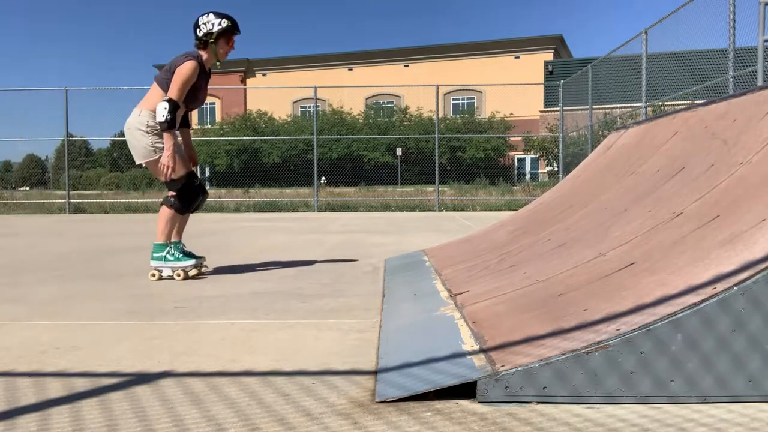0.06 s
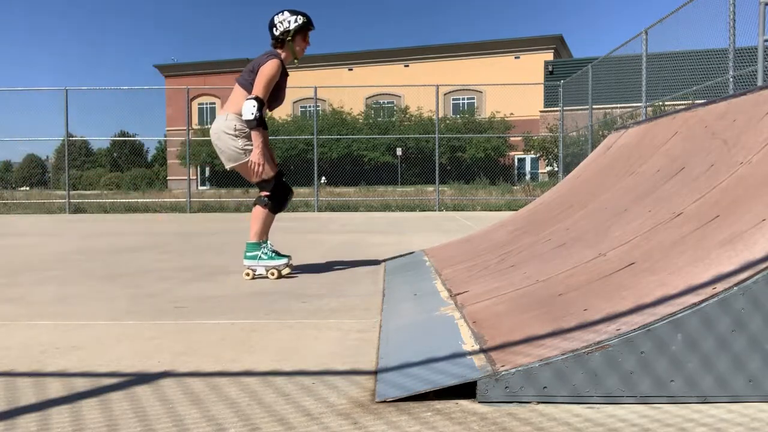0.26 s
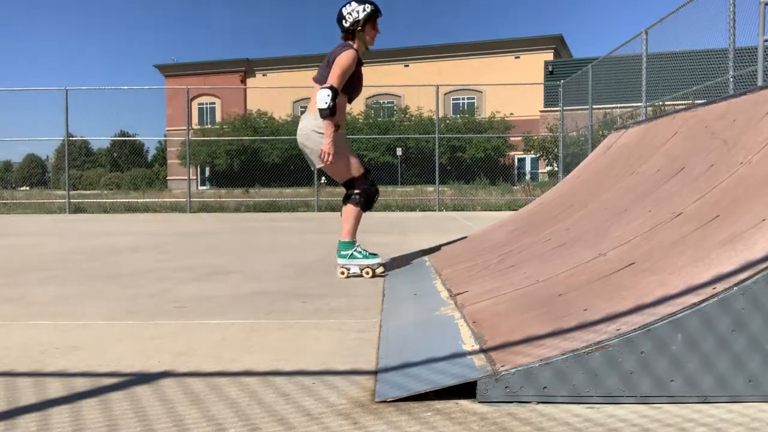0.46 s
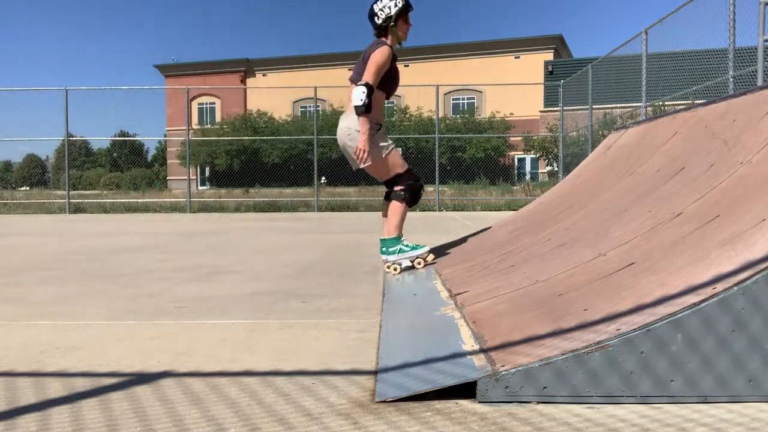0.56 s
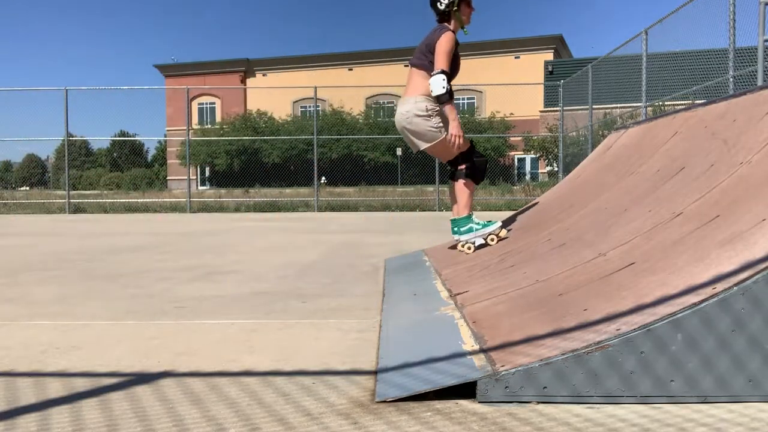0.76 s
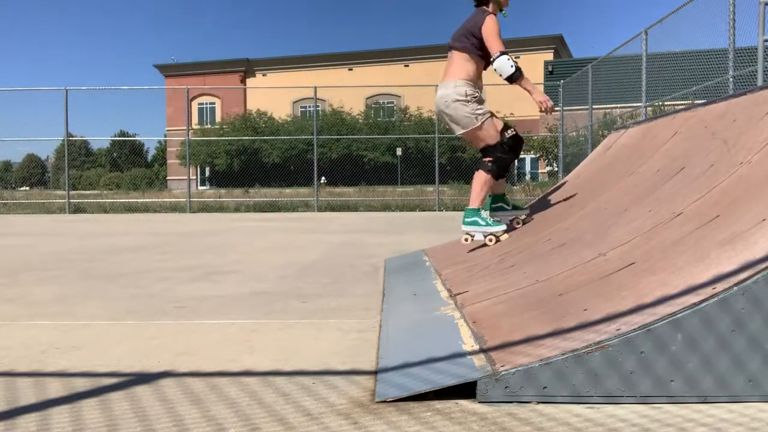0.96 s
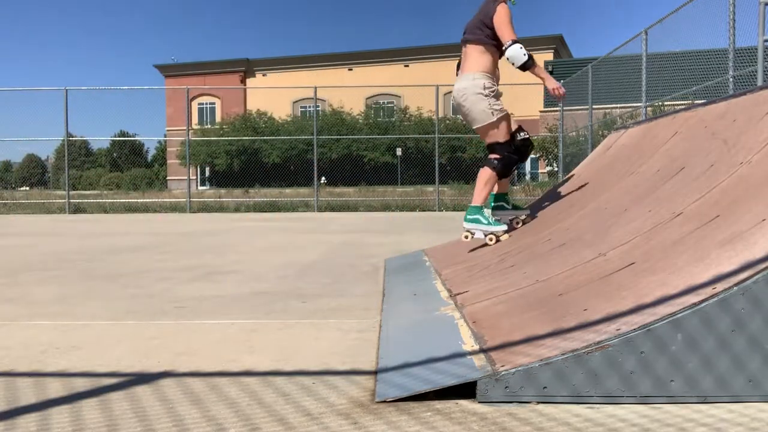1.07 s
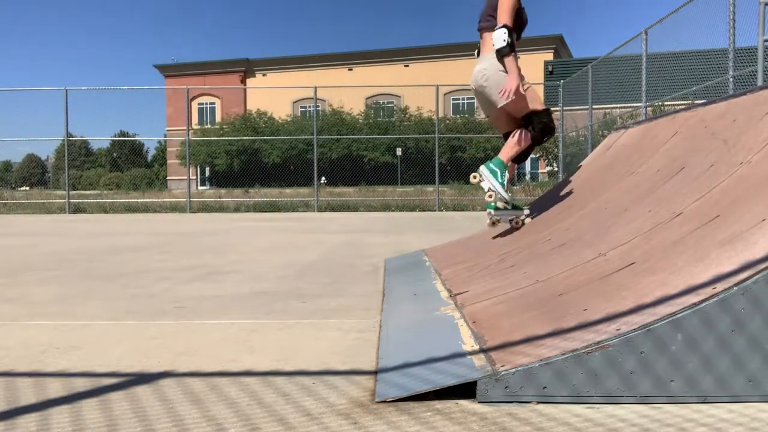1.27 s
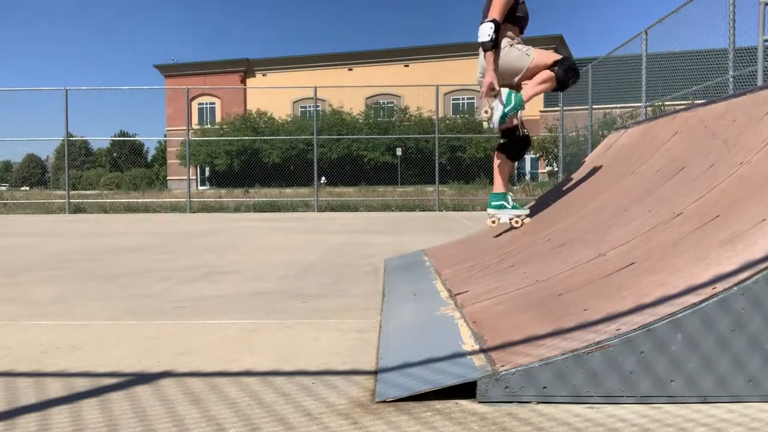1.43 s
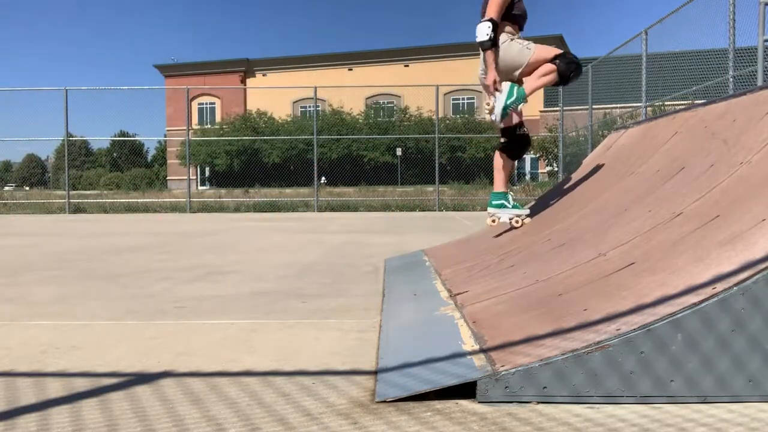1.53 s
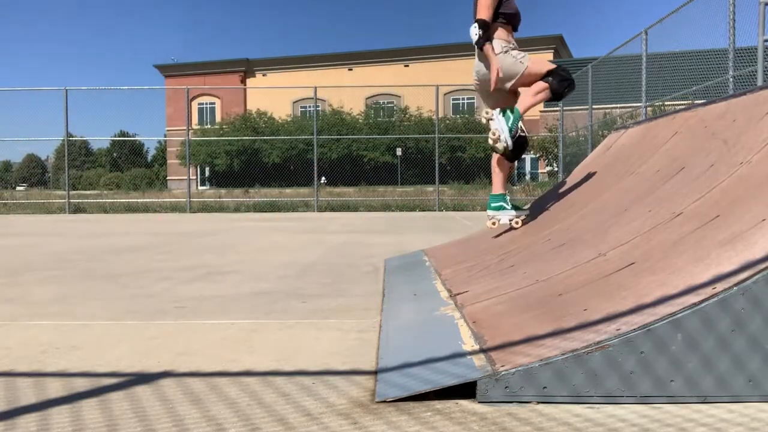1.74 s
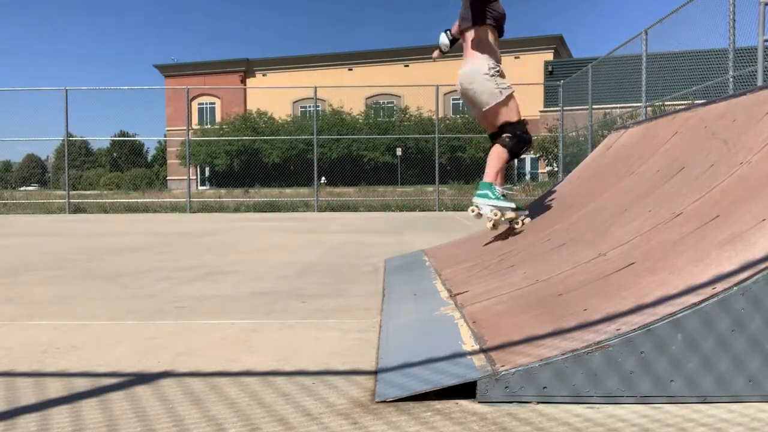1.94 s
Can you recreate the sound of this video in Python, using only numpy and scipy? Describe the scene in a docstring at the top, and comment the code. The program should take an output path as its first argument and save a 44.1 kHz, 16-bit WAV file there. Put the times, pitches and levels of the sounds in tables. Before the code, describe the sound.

Roller skates roll over concrete, clack loudly onto a ramp and rumble up it.

```python
"""Roller skates roll in from the left over concrete, drumming and rattling, trucks ticking, while a light
wind rumbles on the microphone over faint open air. A wheel bearing whines briefly. Just past half a
second the wheels clack across the steel lip of a quarter pipe, each strike ringing the plate. The hollow
deck thumps and booms under the skater's weight, and the roar of the wheels sinks in pitch as the climb
slows them on the right. A few last ticks and rattles are left in the wind."""
import sys
import numpy as np
from scipy import signal
from scipy.fft import rfft, irfft
from scipy.io import wavfile
from scipy.ndimage import map_coordinates

SR = 44100
rng = np.random.default_rng(int(sys.argv[2]) if len(sys.argv) > 2 else 0)


def dump_mix(stems):
    """Bounce the given channels to the path in sys.argv[1] as a 16-bit WAV at rate SR."""
    frames = np.atleast_2d(stems).T  # one column per channel
    limited = np.clip(frames, -1, 1)  # hard clip at full scale
    pcm = np.round(limited * 32767).astype(np.int16)
    wavfile.write(sys.argv[1], SR, pcm)


N = 88200

# wheels striking the lip plate (time [s], bright ring [dB], low clank [dB], crack [dB])
LIP_STRIKES = [(0.5529, -46.5, -30, -38.5), (.5700, -37, -31.5, -31.5), (0.5736, -29, -28, -32.5),
               (0.5762, -8.5, -17, -26.5), (.5812, -10.5, -6, -39.5), (.5870, -6, -11.5, -24.5),
               (.5935, -32, -8.5, -29), (.604, -23, -19.5, -35.5), (.6183, -5.5, -17.5, -34.5),
               (0.6215, -27, -4.5, -21), (0.6352, -7, -23.5, -40.5), (.6465, -26, -23, -42.5)]
SIDE = np.array([[1], [-1]])  # opposite polarity left and right, for width


def undb(db):
    """Decibels to gain."""
    return 10 ** (np.asarray(db) / 20)


def unit(x):
    """Scale to rms 1."""
    return x / np.sqrt(np.mean(x ** 2))


def clock():
    """Time of every sample, in seconds."""
    return np.arange(N) / SR


def curve(rows, column=1):
    """Automation lane: one column of a table, joined by straight lines in time."""
    rows = np.array(rows, float)
    return np.interp(clock(), rows[:, 0], rows[:, column])


def colour(x, spectrum):
    """EQ x through (frequency [Hz], level [dB]) points, then scale to rms 1."""
    hz, db = np.array(spectrum, float).T
    bins = np.maximum(np.fft.rfftfreq(N, 1 / SR), 1)
    gain = undb(np.interp(np.log(bins), np.log(hz), db))
    return unit(irfft(rfft(x) * gain, N))


def noise(spectrum):
    """Coloured noise at rms 1."""
    return colour(rng.standard_normal(N), spectrum)


def wide(spectrum, side):
    """Stereo noise: a mid layer plus an independent side layer."""
    return noise(spectrum) + side * noise(spectrum) * SIDE


def below(x, hz):
    """The part of x under a steep crossover."""
    return irfft(rfft(x) / (1 + (np.fft.rfftfreq(N, 1 / SR) / hz) ** 16), N)


def fade(start, t60, attack):
    """Envelope of a blow: a short rise and an exponential decay, all times in seconds."""
    age = np.maximum(clock() - start, 0)
    return (1 - np.exp(-(age / attack) ** 2)) * np.exp(-np.log(1000) * age / t60)


def wind():
    """Light gusts rumble on the microphone."""
    spectrum = [(15, -5), (35, 0), (55, -1.5), (100, -8), (200, -24.5), (400, -48), (1500, -112)]  # deep buffeting (frequency [Hz], level [dB])
    gusts = [(0, -44.5), (.2, -34.5), (.42, -29), (.5, -29.5), (.6, -28), (.85, -36), (1.15, -30.5),
             (1.4, -32), (1.52, -32.5), (1.66, -41.5), (2, -36)]  # rise and fall of the wind (time [s], level [dB])
    return wide(spectrum, side=0.4) * undb(curve(gusts))


def open_air():
    """A faint, steady bed of outdoor noise."""
    spectrum = [(30, -0.5), (150, -1.5), (300, -7.5), (500, -16.5), (1000, -17), (2000, -28.5), (4000, -38),
                (8000, -50), (16000, -68)]  # dark ambience (frequency [Hz], level [dB])
    return wide(spectrum, side=0.5) * undb(-51.5)


def tread(spectrum):
    """Dense bumps of surface grit under the wheels, fluttering as they turn."""
    grit_db, flutter_db = 4, 2
    bumps = rng.standard_normal(N) * undb(grit_db * np.minimum(rng.exponential(size=N), 6))
    flutter = noise([(1, 0), (25, 0), (60, -20), (200, -70)])
    return colour(bumps, spectrum) * undb(flutter_db * flutter)


def rolling():
    """Wheels on concrete, then on the deck, where the roar sinks in pitch as the climb slows them."""
    concrete_tone = [(40, -14), (120, -11.5), (300, -8), (650, -7), (900, -22.5), (1300, -17.5),
                     (2200, -32), (4000, -35.5), (9000, -33), (16000, -38.5)]  # wheels on the slab (frequency [Hz], level [dB])
    concrete_roll = [(0, -45), (.15, -48), (.25, -47.5), (.35, -47.5), (.44, -47), (.54, -47.5),
                     (.62, -52.5), (.72, -66.5)]  # the approach (time [s], level [dB])
    deck_tone = [(40, -7), (100, 1), (250, -5), (410, 0), (530, -6.5), (640, -5.5), (820, -14.5),
                 (1150, -16), (1600, -26.5), (2500, -40), (5000, -40.5), (10000, -43), (16000, -54)]  # wheels on the deck at full speed (frequency [Hz], level [dB])
    deck_roll = [(.55, -49, 1), (.6, -30, 0.93), (.7, -28.5, 1), (.77, -30, 0.98), (.86, -34.5, .9),
                 (.935, -37, .76), (.985, -44.5, 0.66), (1.13, -53, 0.46), (1.5, -77.5, 0.44)]  # the climb (time [s], level [dB], speed [1 = at the ramp's foot])
    travel = np.cumsum(curve(deck_roll, column=2))
    roar = map_coordinates(tread(deck_tone), [travel], mode="mirror")  # varispeed
    return tread(concrete_tone) * undb(curve(concrete_roll)) + roar * undb(curve(deck_roll))


def slab_drumming():
    """The wheels drum low on the concrete slab."""
    spectrum = [(40, -17), (90, 6.5), (130, 0), (200, -3), (300, -20), (800, -67.5)]  # bass of the slab (frequency [Hz], level [dB])
    swells = [(0, -50.5), (.18, -42.5), (.235, -26), (.33, -37), (.43, -30.5), (.5, -40), (.56, -36),
              (.62, -55.5), (.8, -90.5)]  # surges of drumming (time [s], level [dB])
    return noise(spectrum) * undb(curve(swells))


def rattles():
    """Showers of tiny clicks from bearings, buckles and wheels as the feet shift."""
    showers = [(0, 0.13, -62.5), (0.222, 0.13, -62), (0.427, .13, -66.5), (1.001, .06, -47.5),
               (1.083, 0.039, -56), (1.221, .03, -71.5), (1.378, 0.13, -66), (1.551, 0.15, -62.5),
               (1.861, 0.1, -62.5)]  # bursts of rattle and scuff (start [s], length [s], level [dB])
    spectrum = [(700, 3), (2000, -2.5), (3800, 3.5), (5000, -3), (6200, -0.5), (9000, -8.5), (12000, -19.5),
                (16000, -15)]  # bright clatter (frequency [Hz], level [dB])
    clicks_per_s, scatter_db = 380, 2.2
    onsets = rng.random(N) < clicks_per_s / SR
    clicks = onsets * undb(scatter_db * np.minimum(rng.exponential(size=N), 4))
    chatter = unit(signal.fftconvolve(clicks, fade(0, t60=.012, attack=.0003))[:N])
    envelope = np.zeros(N)
    for start, length, db in showers:
        progress = np.clip((clock() - start) / length, 0, 1)
        envelope += undb(db) * np.sqrt(np.sin(np.pi * progress).clip(0))
    return noise(spectrum) * chatter * envelope


def truck_ticks():
    """Loose metal in the trucks and bearings gives small bright ticks, each with a faint tail."""
    ticks = [(0.09, -41), (.422, -43.5), (0.476, -62), (0.737, -35), (0.7625, -36), (.767, -41.5),
             (1.008, -39.5), (1.0167, -32.5), (1.022, -36.5), (1.028, -40), (1.039, -35), (1.043, -46),
             (1.053, -44), (1.066, -35), (1.453, -48), (1.753, -37)]  # metal touching metal (time [s], level [dB])
    spectrum = [(400, 0), (2000, -6), (3400, -3), (4300, 8), (5000, 9.5), (6000, 4.5), (7200, -9),
                (8600, 9), (11000, -1), (13500, -4), (15500, -6)]  # thin metallic top (frequency [Hz], level [dB])
    envelope = np.zeros(N)
    for start, db in ticks:
        snap = fade(start, t60=.015, attack=.0004)
        tail = undb(-25) * fade(start, t60=.09, attack=.002)
        envelope += undb(db) * (snap + tail)
    return noise(spectrum) * envelope


def wheel_knocks():
    """A wheel knocks on the ground or the deck: a short, dull burst of noise."""
    knocks = [(.245, -39), (0.276, -39), (0.7397, -17.5), (1.008, -37.5), (1.02, -34.5), (1.037, -33.5),
              (1.381, -45.5)]  # wheel impacts (time [s], level [dB])
    spectrum = [(100, -21), (300, -7), (700, 1.5), (1250, -14), (1500, -36), (2300, -26.5), (3000, -33),
                (8000, -41)]  # boxy midrange (frequency [Hz], level [dB])
    return noise(spectrum) * sum(undb(db) * fade(start, t60=.025, attack=.00013) for start, db in knocks)


def bearing_whine():
    """A wheel bearing whines just before the ramp: a narrow, unsteady band of noise."""
    swell = [(.3, -130), (.39, -103), (.43, -68.5), (.55, -64.5), (.6, -79), (.7, -130)]  # rise and fall of the whine (time [s], level [dB])
    centre_hz, width_hz = 5120, 400
    waver = below(rng.standard_normal(N), width_hz / 2)
    return unit(waver * np.sin(2 * np.pi * centre_hz * clock())) * undb(curve(swell))


def deck_boom():
    """The hollow deck booms under the skater's weight."""
    spectrum = [(25, -13), (50, -2), (72, 1), (105, -4), (150, -10.5), (220, -18), (320, -33.5), (700, -54),
                (2000, -91)]  # bass of the hollow ramp (frequency [Hz], level [dB])
    swells = [(.4, -46), (.6, -29), (.73, -18.5), (.8, -25), (.92, -28), (1.04, -23), (1.12, -45.5),
              (1.2, -33.5), (1.32, -43.5), (1.39, -29), (1.45, -42.5), (1.51, -37.5), (1.65, -58.5),
              (2, -51)]  # surges of the boom (time [s], level [dB])
    return wide(spectrum, side=.33) * undb(curve(swells))


def ring(modes, start, spread):
    """Decaying modes from one strike; spread scatters their phases, as the wheel lands on a new spot."""
    contact_s, detune_share = .0011, .0023
    hz, db, t60 = np.array(modes, float).T[:, :, None]
    first = int(start * SR)
    age = np.maximum(clock()[first:first + SR // 4] - start, 0)
    detune, phase = rng.standard_normal((2, len(modes), 1))
    waves = np.sin(2 * np.pi * hz * (1 + detune_share * detune) * age + np.pi * spread * phase)
    decays = np.exp(-np.log(1000) * age / t60)
    ringing = (undb(db) * waves * decays).sum(0) / undb(db).sum()
    out = np.zeros(N)
    out[first:first + len(age)] = 2 * ringing * (1 - np.exp(-(age / contact_s) ** 2))
    return out


def lip_plate():
    """Each hard wheel gives a short pock and rings the steel plate's bright and low modes."""
    # the plate's bright ring and low clank (frequency [Hz], level [dB], t60 [s])
    bright_modes = [(1530, -12.5, .03), (1618, -3.5, .03), (1774, -6.5, .06), (1874, -8.5, 0.052),
                    (1933, -1.5, 0.033), (1990, -7, .06), (2010, 3.5, .035), (2093, -7.5, 0.052),
                    (2218, -0.5, 0.066), (2290, -16, 0.024), (2732, -24.5, 0.094), (3060, -11, 0.027),
                    (3360, -16.5, 0.065)]
    low_modes = [(352, -9.5, .15), (491.6, -8, .05), (598, -5.5, 0.062), (713.4, -7, 0.12), (816, -5, .07),
                 (890, 1, .04), (964, -2, .07), (1080, -2, .06), (1190, 0, .04), (1266, -3, 0.069),
                 (1480, -5, 0.0352), (1703, -2.5, .035)]
    pock_hz, pock_db = 1960, 4
    out = np.zeros(N)
    for start, ring_db, clank_db, _ in LIP_STRIKES:
        tone = np.sin(2 * np.pi * pock_hz * (clock() - start))
        pock = undb(pock_db) * tone * fade(start, t60=.011, attack=.0017)
        out += undb(ring_db) * (pock + ring(bright_modes, start, spread=0.14))
        out += undb(clank_db) * ring(low_modes, start, spread=0.32)
    return out


def plate_cracks():
    """The plate chatters against the concrete at every strike."""
    spectrum = [(500, -3.5), (2000, 18.5), (2700, -2.5), (3300, 5), (4300, -4), (5200, 5.5), (6800, -5),
                (8500, 0), (11000, -2.5), (13000, -6.5), (16000, -13)]  # hard bite of steel on concrete (frequency [Hz], level [dB])
    envelope = sum(undb(db) * fade(start, t60=.076, attack=.0011) for start, _, _, db in LIP_STRIKES)
    return noise(spectrum) * envelope


def deck_thumps():
    """The deck flexes under the wheels, each thump one low, damped tone."""
    thumps = [(.579, -17.5, 193.4, 0.11), (.6010, -14, 270, .05), (.611, -22.5, 110, .09),
              (.6285, -14.5, 275, 0.091), (0.6449, -10, 350, 0.03), (0.668, -21, 99, .1),
              (.710, -11, 83, 0.079), (0.738, -10, 91.7, 0.094), (1.018, -21, 74.5, 0.27),
              (1.379, -21.5, 65, 0.039), (1.49, -17, 60, 0.065)]  # flexes of the deck (time [s], level [dB], pitch [Hz], t60 [s])
    out = np.zeros(N)
    for start, db, hz, t60 in thumps:
        out += undb(db) * np.sin(2 * np.pi * hz * (clock() - start)) * fade(start, t60, attack=.0015)
    return out


def reverb(x, t60):
    """A diffuse echo: short from the ramp's shell, longer from around the park."""
    spectrum = [(100, -3), (2000, -6), (4000, 4), (16000, -14.5)]  # tone of the reflections (frequency [Hz], level [dB])
    response = noise(spectrum) * fade(0, t60, attack=.006)
    return signal.fftconvolve(x, response / np.linalg.norm(response))[:N]


def delay(x, samples):
    """Delay x by a fractional, possibly moving, number of samples."""
    return map_coordinates(x, [np.arange(N) - samples], mode="mirror", order=5)


def microphone_ports(x):
    """Two ports: centred bass, a midrange that lags with direction, treble delayed on the right."""
    path = [(0, -5), (.35, -2.5), (.6, 1.97), (.85, 3), (1.1, 4.5), (2, 5)]  # the skater's direction (time [s], lag of left behind right [samples])
    treble_delay_s = .000378
    bass, body = below(x, hz=1330), below(x, hz=7450)
    mids, treble = body - bass, x - body
    half_lag = curve(path) / 2
    left = delay(mids, half_lag) + treble
    right = delay(mids, -half_lag) + delay(treble, treble_delay_s * SR)
    return bass + np.array([left, right])


def scene():
    """The skates cross from left to right, over the boom of the deck, wind and open air."""
    shell_db, park_db, right_lift_db = -14, -25.5, 0.54
    hits = lip_plate() + plate_cracks() + wheel_knocks() + deck_thumps()
    drumming = slab_drumming()
    shell = undb(shell_db) * reverb(hits, t60=0.16)
    skates = hits + shell + drumming + truck_ticks() + rattles() + rolling() + bearing_whine()
    width = (0.26 * rolling() + 0.18 * (plate_cracks() + truck_ticks())) * SIDE  # fresh noise layers
    park = undb(park_db) * np.array([reverb(hits, t60=0.65) for _ in range(2)])
    mix = microphone_ports(skates) + width + park + deck_boom() + wind() + open_air()
    return mix * undb(-SIDE * right_lift_db / 2)


def record(dry):
    """A gentle low cut trims the deepest rumble and a steep high cut takes off the very top."""
    low_cut_hz, high_cut_hz = 22, 16200
    trimmed = signal.sosfilt(signal.butter(2, low_cut_hz, "high", fs=SR, output="sos"), dry)
    return signal.sosfilt(signal.ellip(10, .2, 80, high_cut_hz, fs=SR, output="sos"), trimmed)


dry = scene()
out = record(dry)
dump_mix(out)
```